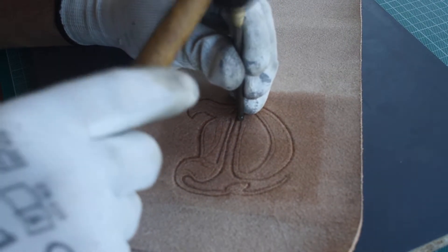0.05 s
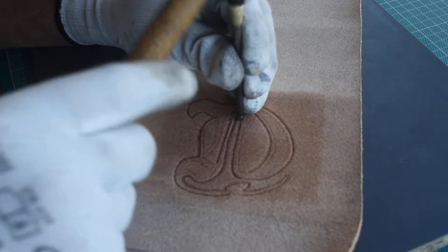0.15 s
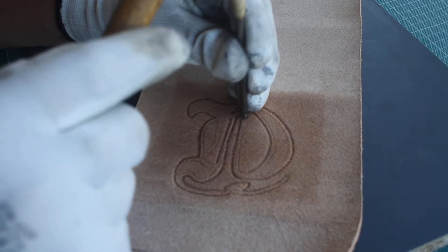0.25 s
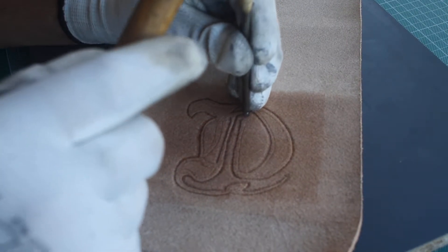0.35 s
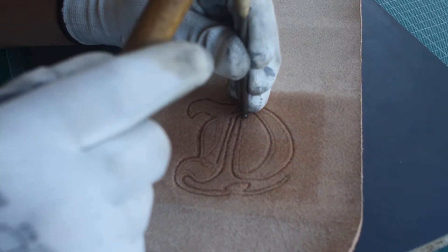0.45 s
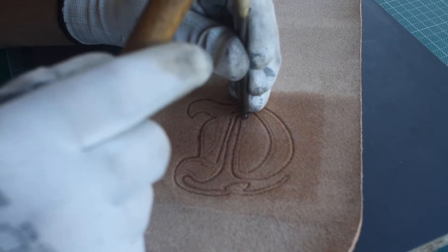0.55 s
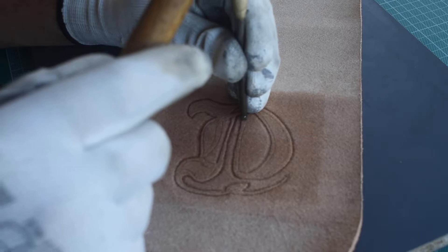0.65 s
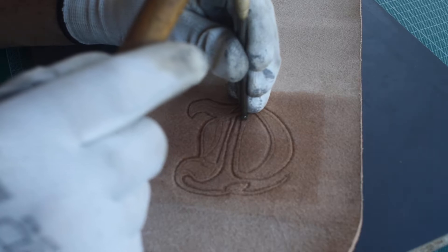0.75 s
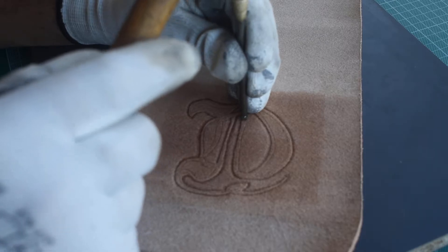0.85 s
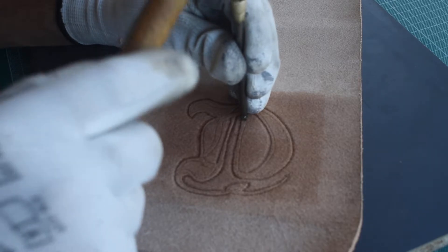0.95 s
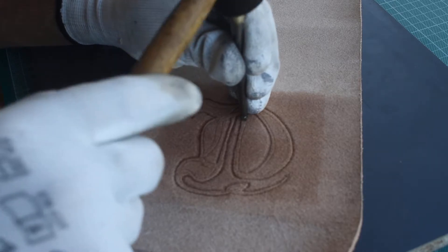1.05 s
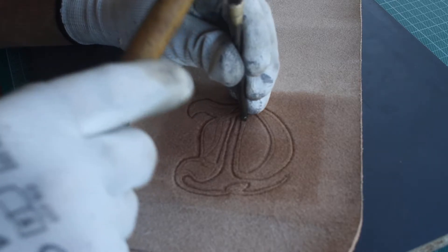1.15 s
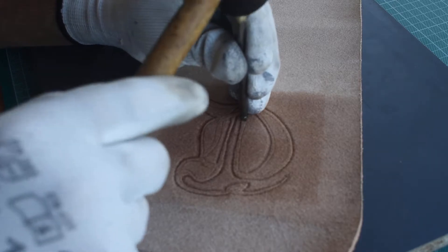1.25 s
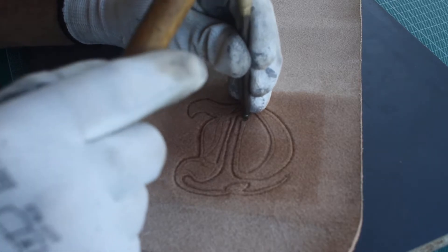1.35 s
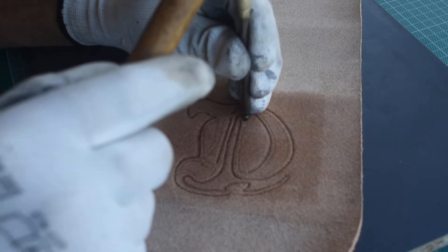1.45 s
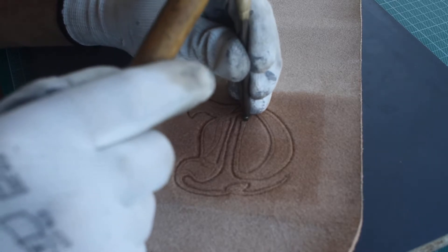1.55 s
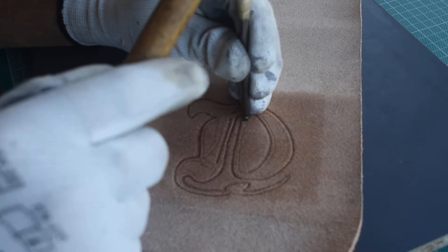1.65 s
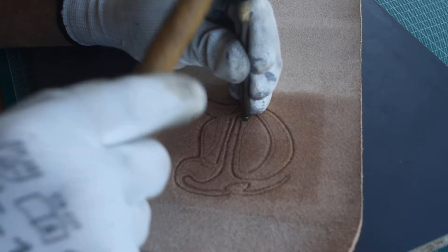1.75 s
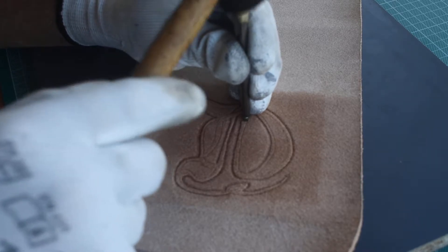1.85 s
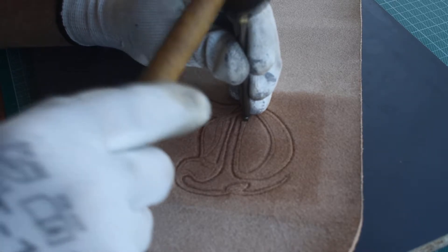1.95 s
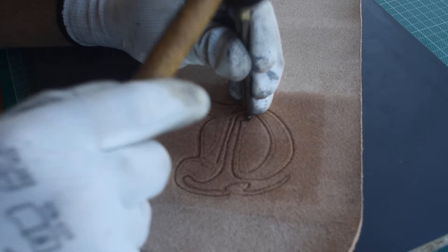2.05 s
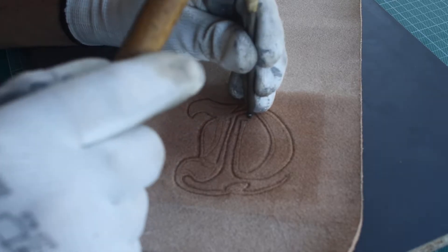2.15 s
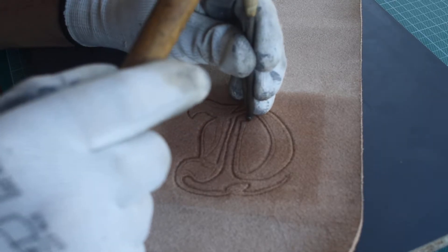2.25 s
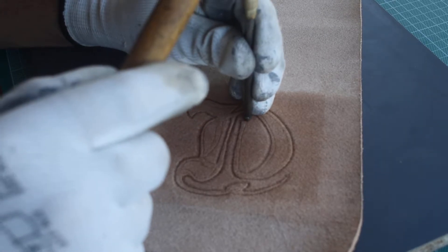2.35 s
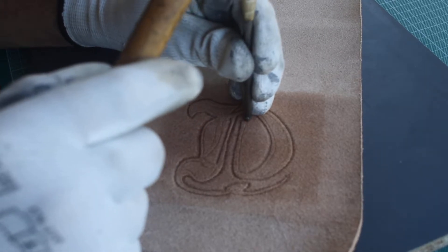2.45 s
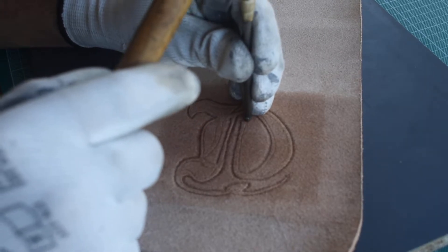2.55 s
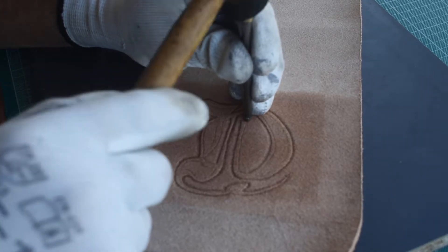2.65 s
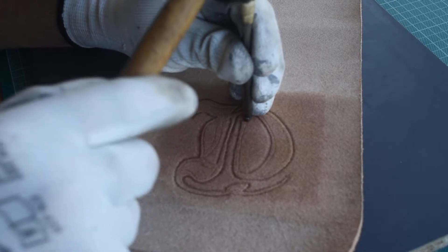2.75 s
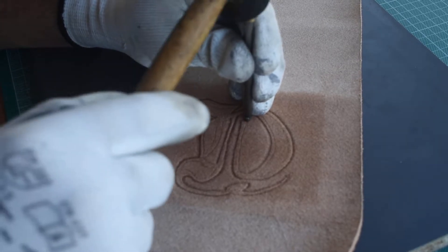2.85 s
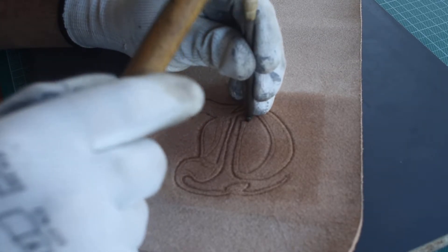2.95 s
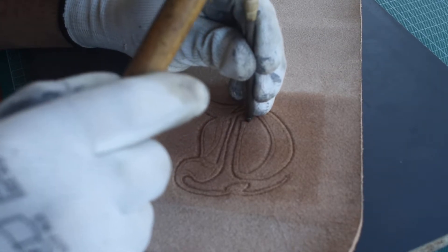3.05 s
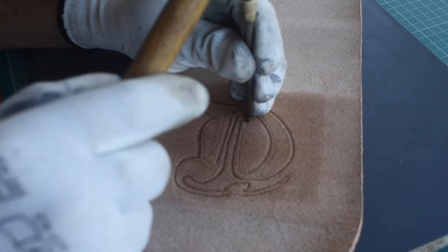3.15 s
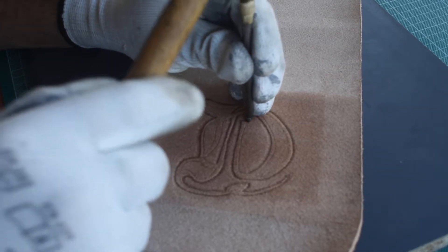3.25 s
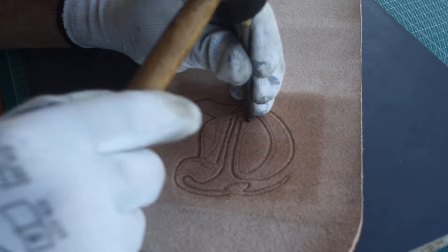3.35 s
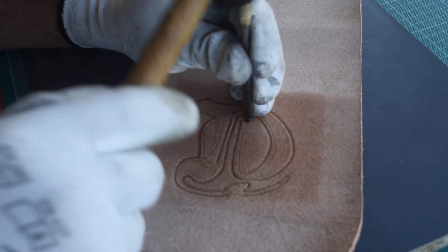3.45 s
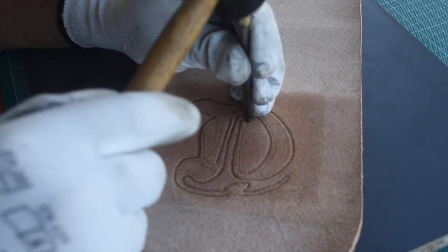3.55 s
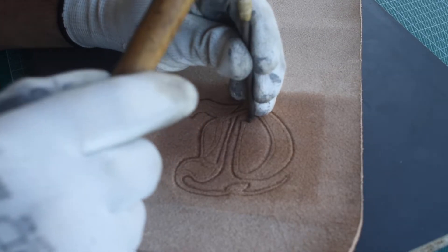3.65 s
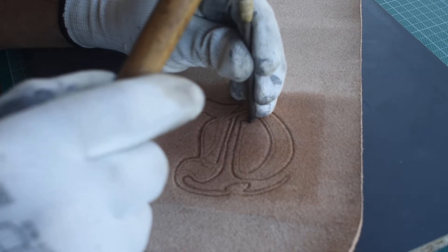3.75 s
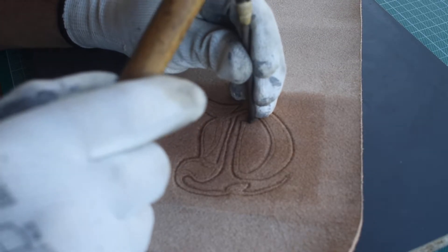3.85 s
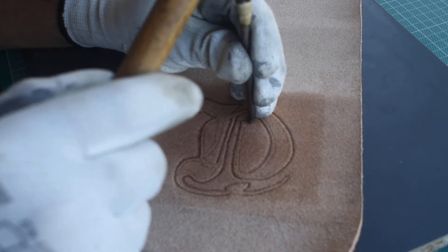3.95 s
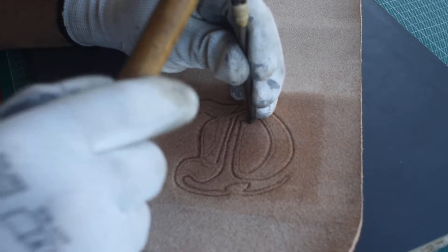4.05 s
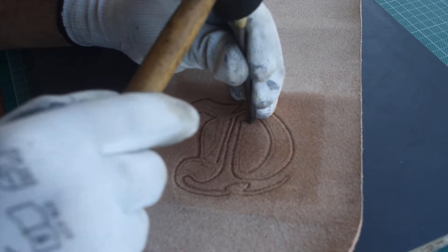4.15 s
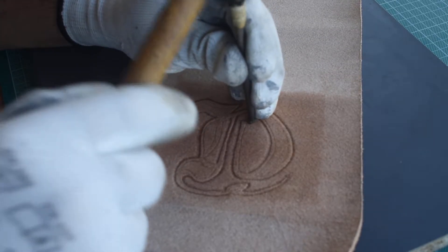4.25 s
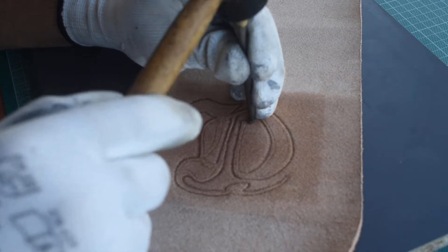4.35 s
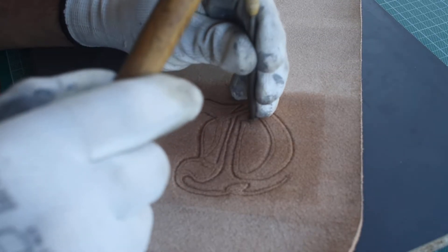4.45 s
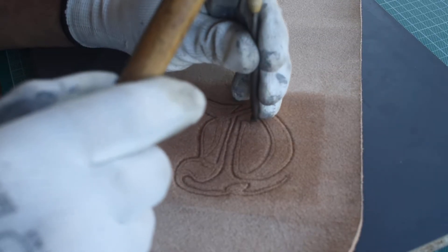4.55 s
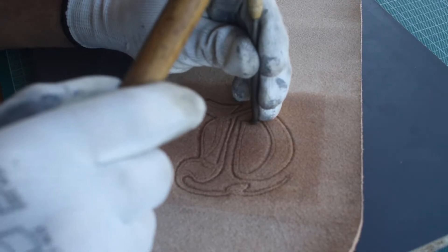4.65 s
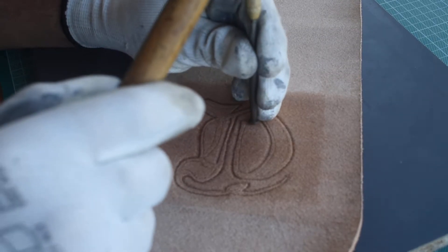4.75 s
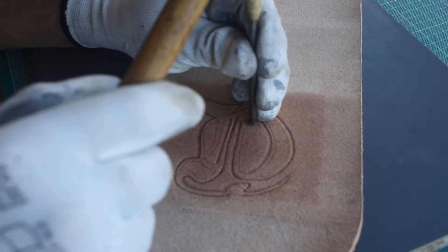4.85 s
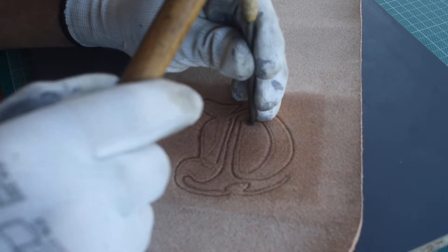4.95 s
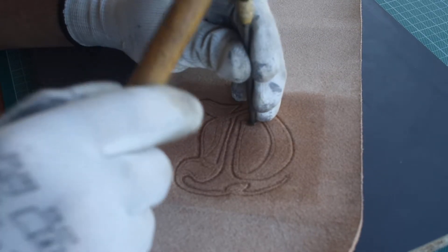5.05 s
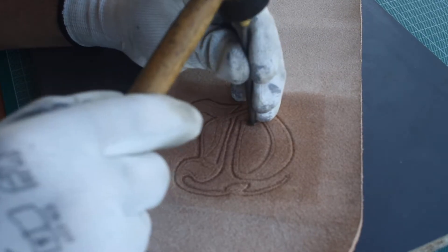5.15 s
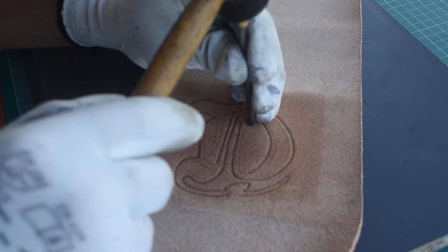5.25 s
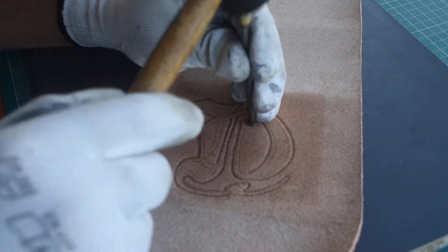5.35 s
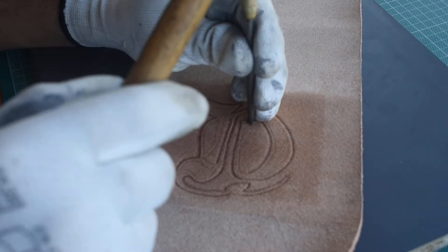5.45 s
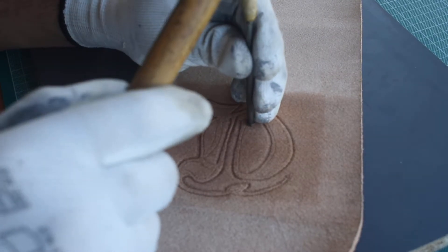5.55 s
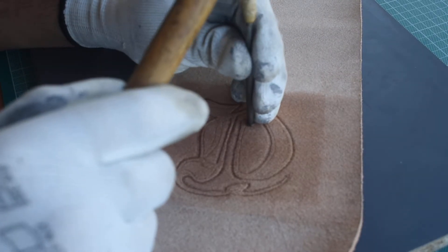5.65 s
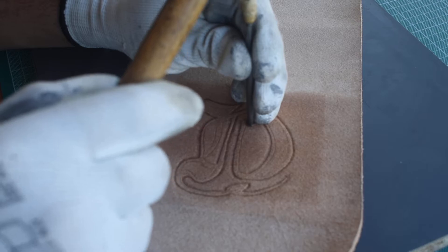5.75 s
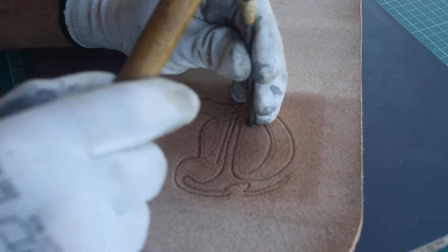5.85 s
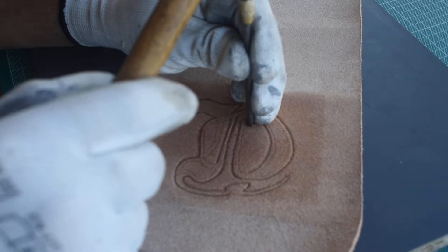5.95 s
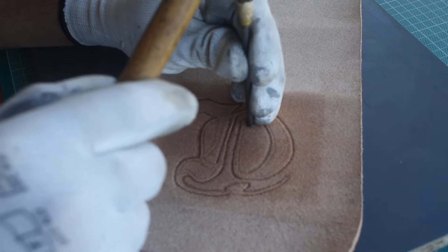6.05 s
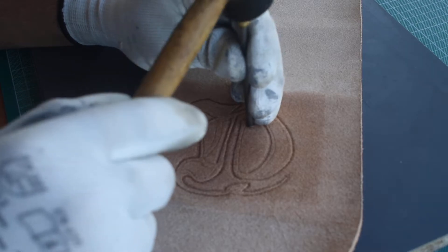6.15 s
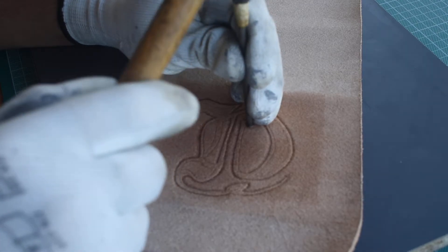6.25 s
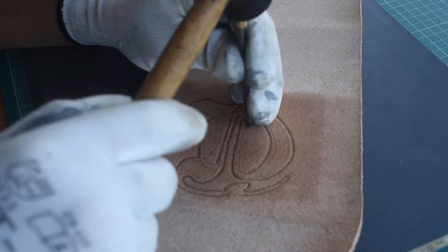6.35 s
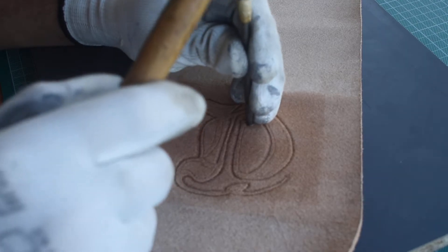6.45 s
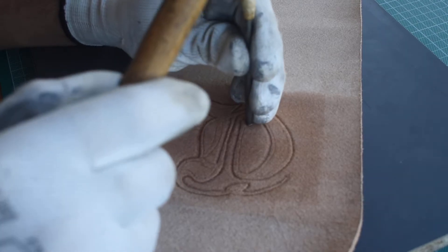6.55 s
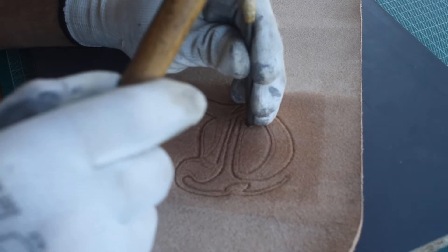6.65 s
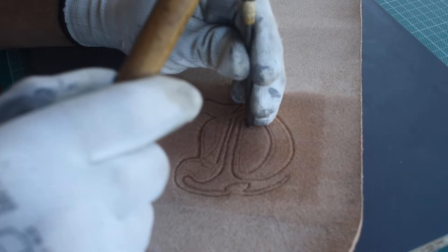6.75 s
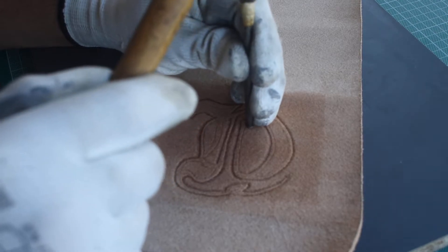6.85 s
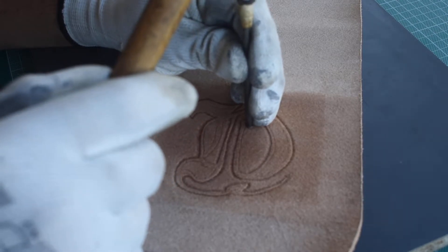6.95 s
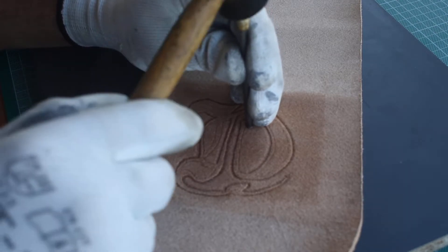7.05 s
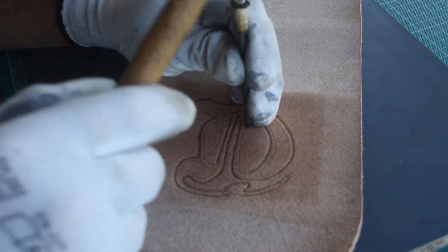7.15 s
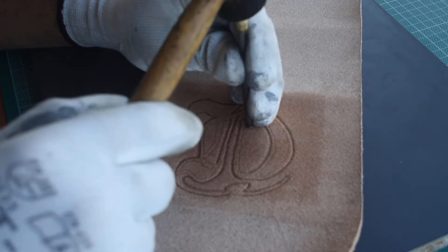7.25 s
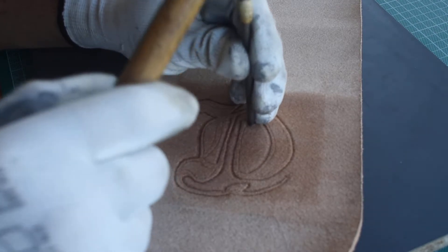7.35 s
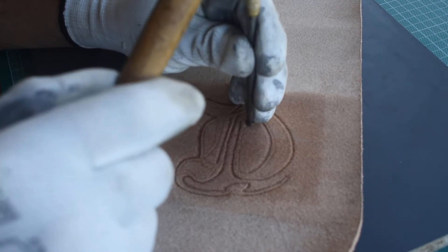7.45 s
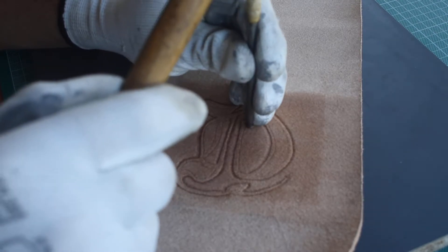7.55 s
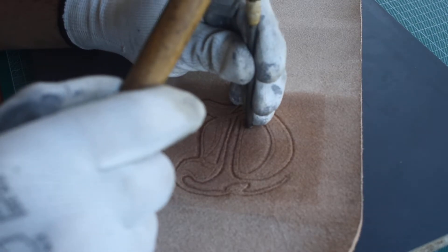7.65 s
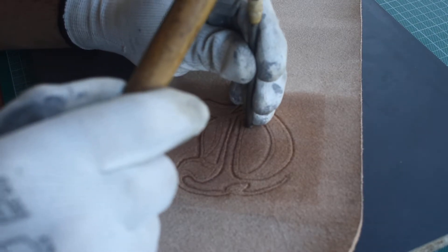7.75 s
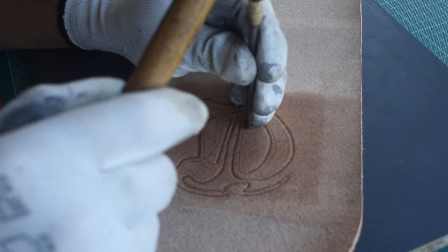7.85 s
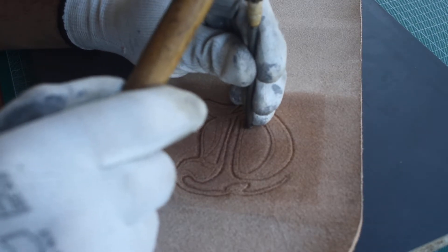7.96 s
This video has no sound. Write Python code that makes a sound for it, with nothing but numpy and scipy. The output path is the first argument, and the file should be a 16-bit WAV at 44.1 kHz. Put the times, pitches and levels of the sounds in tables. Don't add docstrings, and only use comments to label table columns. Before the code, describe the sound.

Loud, slightly overloaded woody taps come in regular pairs, seventeen blows in eight seconds, each with a light steel click and a brief boxy echo. The small workroom lets in quiet outdoor sound: low town rumble, hoarse falling sparrow chirps and tiny peeps, tyre noise swelling in the second half, and a barely audible distant brake squeal. The background dips just after each blow and creeps back.

```python
import sys
import numpy as np
from scipy import signal
from scipy.fft import rfft, irfft
from scipy.io import wavfile
from scipy.ndimage import uniform_filter1d

SR = 44100
rng = np.random.default_rng(int(sys.argv[2]) if len(sys.argv) > 2 else 0)


def generate_wav(signal):
    frames = np.transpose(np.atleast_2d(signal))
    scaled = np.clip(frames, -1, 1) * 32767
    pcm = np.round(scaled).astype(np.int16)
    wavfile.write(sys.argv[1], SR, pcm)


def nominal_scale(level):
    x = np.asarray(level, float) / 20
    return 10 ** x


N = 352800


def level(x, db):
    return x * nominal_scale(db) / np.sqrt(np.mean(x ** 2))


def colour(x, hz, db):
    bins = np.arange(len(x) // 2 + 1) * SR / len(x) + 1
    gain_db = np.interp(np.log(bins), np.log(hz), db)
    return irfft(rfft(x) * nominal_scale(gain_db), len(x))


def ring(t, hz, t60):
    return np.sin(2 * np.pi * hz * t) * 1000. ** (-t / t60)


def add(out, s, x):
    i = int(s * SR)
    out[i:i + len(x)] += x[:N - i]


def walk(rate):
    k = int(SR / rate)
    steps = np.repeat(rng.standard_normal(N // k + 1), k)
    return level(uniform_filter1d(steps, k)[:N], 0)


def noise(count):
    return rng.standard_normal(count)


# frequency in Hz, density in dB per Hz.
TOWN_SPECTRUM = [(15, -57), (25, -4), (135, -6), (182, -1.5), (226, -3.5), (410, -6), (470, -7),
                 (651, -8.5), (1010, -12.5), (1150, -16), (3810, -14.5), (14400, -38), (16500, -44)]


def town():
    rumble = level(colour(noise(N), *np.transpose(TOWN_SPECTRUM)), 3.44)
    return rumble * nominal_scale(-60.5 + .6 * walk(3))


# start in seconds, tyre roar in dB.
CAR_APPROACH = [
    (0, -57.5),
    (2.3, -59),
    (3.5, -57.5),
    (4.6, -55.5),
    (5.6, -52),
    (6.7, -54),
    (8, -52.5),
]


def car():
    t = np.arange(N) / SR
    roar_db = np.interp(t, *np.transpose(CAR_APPROACH))
    in_view_s, corner_s = 7.44, 0.079
    hiss_db = -79.5 + 22.5 * (1 + np.tanh((t - in_view_s) / corner_s)) / 2
    roar = level(colour(noise(N), [400, 943, 2100, 3000], [-24.0, 5.5, -2, -26.5]), -7)
    hiss_hz = [2512, 5000, 7860, 8550, 9200, 10210, 12000, 14000]
    hiss = level(colour(noise(N), hiss_hz, [0.0, 0.0, -4.0, -2.0, -7, -18, -22, -36]), 0.27)
    return roar * nominal_scale(roar_db + 1.1 * walk(8)) + hiss * nominal_scale(hiss_db + 1.3 * walk(15))


def steel_push(contact_ms, lag_ms):
    t_ms = 1000 * np.arange(132) / SR
    hump = np.sin(np.pi * np.clip(t_ms / contact_ms, 0, 1)) ** 2
    main = np.roll(hump, round(lag_ms * SR / 1000))
    return (.05 * hump + .95 * main) / hump.sum()


# frequency in Hz, signed swing, t60 in ms.
BOARD_MODES = [(320, -.25, 14), (580, .27, 12), (930, .72, 16), (1230, -.35, 12), (1410, .52, 20),
               (1530, .86, 15), (1750, -.15, 25), (2060, 1.05, 11), (2340, .75, 9)]
# delay in ms, signed share.
WALL_ECHOES = [(10.5, -0.066), (15.05, -0.11)]


def board_knock(t, push):
    board = np.zeros(len(t))
    for hz, swing, ms in BOARD_MODES:
        board += swing * ring(t, hz * (1 + .01 * rng.standard_normal()), ms / 1000)
    knock = np.convolve(push, board)[:len(t)]
    knock = signal.lfilter(*signal.butter(1, 230, "high", fs=SR), knock)
    for ms, share in WALL_ECHOES:
        knock += share * np.roll(knock, int(ms * SR / 1000))
    return knock


# frequency in Hz, level in dB, t60 in ms.
SHANK_MODES = [(7290, 3.5, 3.8), (5360, -18, 4.5), (4130, -6, 5.6), (3770, -25, 0.62), (3000, 1.5, 3.5),
               (8300, -32, 1.6), (3840, -27.5, 260)]


def steel_tick(t):
    steel = np.zeros(len(t))
    for hz, db, ms in SHANK_MODES:
        steel -= nominal_scale(db) * ring(t, hz * (1 + .01 * rng.standard_normal()), ms / 1000)
    crack = colour(noise(len(t)), [1500, 3000, 7500, 11000, 16000], [3, 12, 8.5, 14, -47])
    crack *= 1000. ** (-t / 0.016)
    return uniform_filter1d(steel + nominal_scale(-7.0) * crack, size=4)


# frequency in Hz, level in dB, t60 in seconds, build-up in ms.
BENCH_MODES = [(404, -4, .25, 48), (426, -9, .1, 12), (972, 2, .07, 6), (88, -28, .4, 30),
               (510, -10, .15, 20), (655, -9, .24, 85), (800, -8, .12, 22), (2060, -20, .1, 10)]


def bench_ring(t):
    out = np.zeros(len(t))
    for hz, db, t60, ms in BENCH_MODES:
        swell = 1 - np.exp(-(1000 * t / ms) ** 4)
        fade = 1000. ** (-(t / t60) ** 1.5)
        out += rng.choice([-1, 1]) * nominal_scale(db) * np.sin(2 * np.pi * hz * t) * fade * swell
    bloom_hz, bloom_db, rise_s, fade_s = 304.4, 6.5, 0.047, 0.15
    bloom = (1 - np.exp(-(t / rise_s) ** 2)) * 1000. ** (-(t / fade_s) ** 2)
    return out + nominal_scale(bloom_db) * np.sin(2 * np.pi * bloom_hz * t) * bloom


# frequency in Hz, level in dB, t60 in seconds.
ROOM_DECAY = [(100, -15, 0.21), (226, -8.5, 0.3), (330, -5, 0.33), (590, -2.5, 0.28), (894, 2.5, 0.21),
              (1390, -7, 0.24), (2230, -17, 0.19), (3200, -25, 0.19), (5000, -33, 0.23),
              (8000, -34.5, 0.15), (9900, -68, 0.067), (13990, -84, 0.066)]


def room_echoes(t):
    spectrum = rfft(noise(len(t)))
    log_hz = np.log(np.arange(len(t) // 2 + 1) * SR / len(t) + 1)
    hz, db, t60 = np.transpose(ROOM_DECAY)
    out = np.zeros(len(t))
    for share, g, fade in zip(np.eye(len(hz)), db, t60):
        band = irfft(spectrum * np.interp(log_hz, np.log(hz), share), len(t))
        out += band * nominal_scale(g) * 1000. ** (-(t / fade) ** 0.96)
    return out * (1 - np.exp(-(t / 0.0075) ** 2))


# start in seconds, push in dB, contact in ms, steel tick in dB.
BLOWS = [(.0975, -.7, .88, -28), (1.0173, -.4, .83, -23.5), (1.2, 0, .79, -25.5), (1.786, -1.5, .71, -25),
         (1.9749, 1.1, .72, -20), (2.6536, -.2, .67, -22), (2.8427, -1.2, .65, -25),
         (3.3072, -.6, .67, -21), (3.4908, -.2, .69, -25), (4.1126, -.2, .73, -22), (4.2977, .4, .71, -20),
         (5.1037, -1, .72, -23.5), (5.2735, -.5, .71, -24), (6.1343, -3.8, .74, -27),
         (6.3271, -.2, .76, -25), (7.0668, .5, .7, -22.5), (7.2486, .4, .72, -22)]


def mallet():
    out, t = np.zeros(N), np.arange(SR // 2) / SR
    room, bench = room_echoes(t), bench_ring(t)
    for k, (s, db, contact_ms, tick_db) in enumerate(BLOWS):
        lag_ms = (.5, .6)[k % 2] - .035 * db
        room_db = (-28.5, -29.5)[k % 2] + db - 9.5 * contact_ms
        knock = board_knock(t, steel_push(contact_ms, lag_ms))
        tail = nominal_scale(19.0) * (room + 0.25 * room_echoes(t)) + bench
        add(out, s, nominal_scale(db + .45) * knock)
        add(out, s, nominal_scale(room_db + 12.0) * tail)
        add(out, s + 0.00017, nominal_scale(tick_db + 2.0) * steel_tick(t))
    return out


def smooth_noise(count, size, passes):
    x = noise(count)
    for _ in range(passes):
        x = uniform_filter1d(x, size=size)
    return level(x, 0)


def whistles(table, echo_db, echo_t60, throb_db):
    dry = np.zeros(N)
    for s, length, hz0, hz1, db, hoarse_hz in table:
        u = np.linspace(0, 1, int(length * SR))
        flutter = smooth_noise(len(u), 130, 1)
        throb = smooth_noise(len(u), 300, 2)
        hz = hz1 + (hz0 - hz1) * (1 - u) ** 0.96 + hoarse_hz * flutter
        harsh_hz = hz + 3 * hoarse_hz * flutter[::-1]
        voice = np.sin(2 * np.pi * np.cumsum(hz) / SR)
        voice += 0.3 * np.sin(2 * np.pi * np.cumsum(harsh_hz) / SR)
        add(dry, s, nominal_scale(db + throb_db * throb) * np.sin(np.pi * u) ** .5 * voice)
    t = np.arange(SR) / SR
    fronts = noise(SR) * (rng.random(SR) < .04)
    yard = fronts * 1000. ** (-t / .12) + nominal_scale(-27) * noise(SR) * 1000. ** (-t / echo_t60)
    yard /= np.sqrt(np.sum(yard ** 2))
    return dry + nominal_scale(echo_db) * signal.fftconvolve(dry, yard)[:N]


def calls(table, parts):
    return [(s + entry * length, share * length, up * hz, down * hz, db + part_db, hoarse_hz)
            for s, length, hz, db in table
            for entry, share, up, down, part_db, hoarse_hz in parts]


# entry and length as shares of the call, start and end pitch
# as shares of its pitch, level in dB, hoarseness in Hz.
SWOOP_PARTS = [(0, .6, 2.2, 1.9, -25, 453.5), (.02, .4, 1.66, 1.28, -6.5, 400),
               (.25, .4, 1.33, 1.12, -5.5, 327.7), (.45, .7, 1.13, 1.0, -5.3, 205)]
CHURR_PARTS = [(0, .7, 2.4, 1.85, -15.5, 400), (.02, .6, 2.1, 1.6, -6.5, 200),
               (.04, .85, 1.45, 1.45, -4.1, 100), (.12, .85, 1.5, 1.2, -5, 450),
               (.15, .85, 1.22, 1.13, -2.2, 120), (.3, 0.79, 0.99, .98, -8, 69.7)]
PEEP_PARTS = [(0, 0.98, 1.02, 0.95, 0.004, 130)]
# start in seconds, length in seconds, pitch in Hz, level in dB.
SWOOPS = [(.61, 0.11, 3100, -53.5), (1.28, 0.1, 3206, -43.5), (1.57, 0.096, 3200, -48.5),
          (3.01, 0.096, 3200, -45.5), (4.74, .13, 3148, -46), (5.95, .13, 2970, -49.5),
          (6.33, 0.13, 3100, -49), (7.9, 0.087, 3150, -49)]
CHURRS = [(.29, 0.19, 2886, -53), (1.09, 0.13, 2970, -53.5), (2.03, 0.13, 2804, -53),
          (2.71, .14, 2736, -56), (3.94, .17, 2797, -54), (4.99, 0.13, 2950, -55.5),
          (6.05, 0.18, 2765, -57), (6.42, 0.4, 2775, -64.5), (6.8, 0.26, 2790, -55),
          (7.46, 0.16, 2902, -54)]
PEEPS = [(.19, 0.048, 5350, -62), (.19, 0.047, 4850, -58), (.22, .1, 3920, -59.5), (1.23, 0.045, 5000, -54),
         (2.21, 0.0454, 4810, -63), (2.27, 0.071, 4850, -60), (2.28, 0.045, 5370, -64),
         (2.32, .07, 3910, -58.5), (2.72, .057, 5480, -65), (4.97, 0.037, 5850, -61),
         (5.38, .03, 4980, -60), (6.58, 0.046, 3800, -60), (.355, .07, 3151, -55), (.62, 0.036, 4130, -65),
         (.99, 0.038, 4900, -59), (1.29, 0.055, 4600, -52)]


def sparrows():
    chorus = calls(SWOOPS, SWOOP_PARTS) + calls(CHURRS, CHURR_PARTS) + calls(PEEPS, PEEP_PARTS)
    return whistles(chorus, 2.5, .9, 2.8)


# start in seconds, frequency in Hz, level in dB, t60 in seconds.
HAND_BUMPS = [
    (7.885, 83, -27.5, 0.03),
    (7.9, 44, -48, 0.23),
    (0.34, 191.6, -49, 0.065),
]


def hand():
    out, t = np.zeros(N), np.arange(SR // 2) / SR
    for s, hz, db, t60 in HAND_BUMPS:
        add(out, s, nominal_scale(db) * ring(t, hz, t60) * np.minimum(t / 0.0079, 1))
    return out


# start in seconds, length in seconds, start and end pitch in Hz, level in dB, waver in Hz.
BRAKE_SQUEALS = [
    (6.4, .13, 6100, 5950, -72, 30),
    (6.52, .1, 6000, 6180, -70, 30),
    (6.6, .2, 6150, 6050, -72, 30),
    (6.48, .07, 9600, 9200, -74, 40),
]


def brake():
    return whistles(BRAKE_SQUEALS, -7, .3, 1.5)


def scene():
    return (town() + car() + mallet() + sparrows() + hand() + brake())[None]


def band_limit(x):
    return signal.sosfilt(signal.butter(12, 16830, fs=SR, output="sos"), x)


# frequency in Hz, gain in dB.
MICROPHONE = [(20, 0.5), (15600, 1), (16200, -11), (16800, -40)]


def record(dry):
    t = np.arange(SR) / SR
    duck_db = np.zeros(N)
    for s, *_ in BLOWS:
        add(duck_db, s + .004, -4.5 * np.exp(-(t / .2) ** 1.5))
    capsule = dry[0] + 0.11 * dry[0] ** 2
    heard = colour(capsule, *np.transpose(MICROPHONE))[None]
    mix = np.clip(heard * nominal_scale(duck_db), -1, 1)
    return band_limit(mix)


dry = scene()
out = record(dry)
generate_wav(out)
```